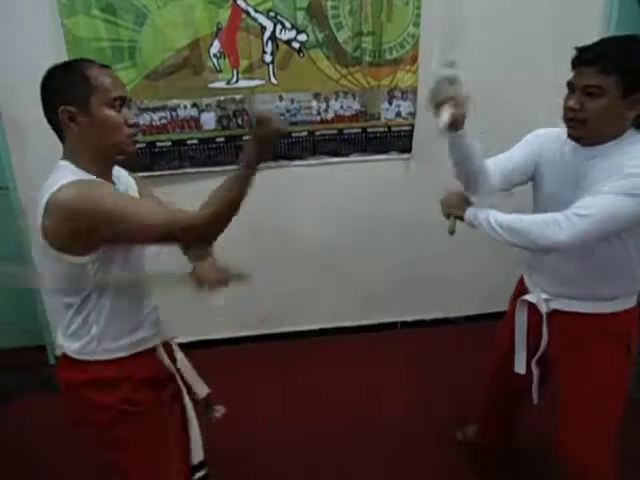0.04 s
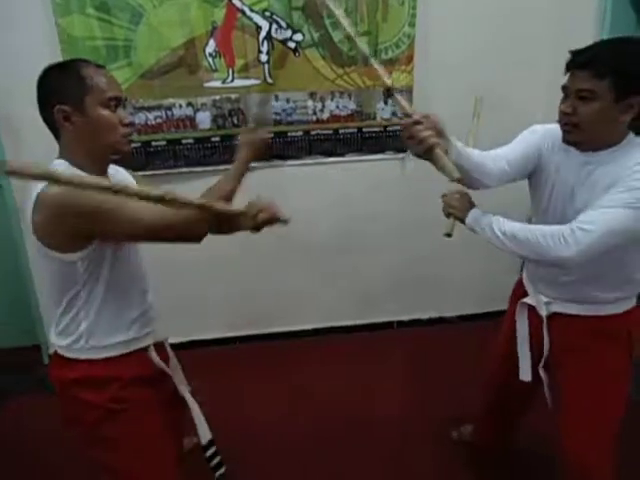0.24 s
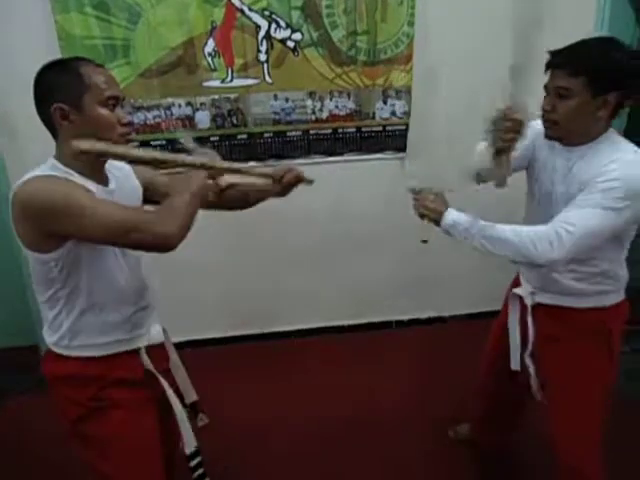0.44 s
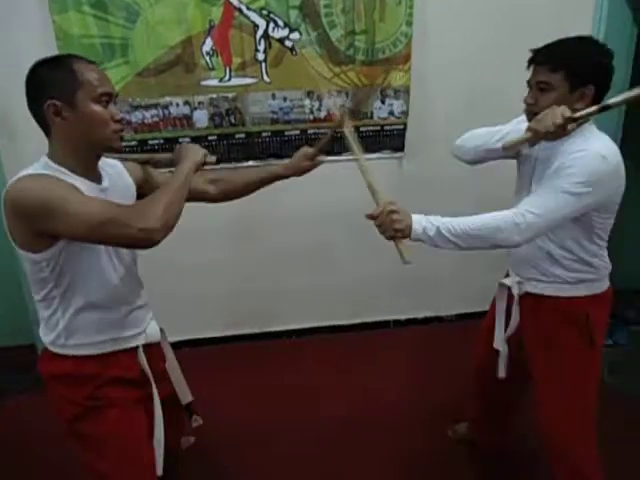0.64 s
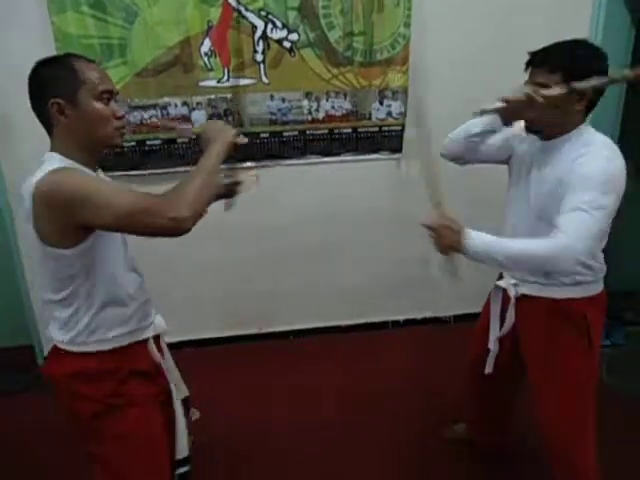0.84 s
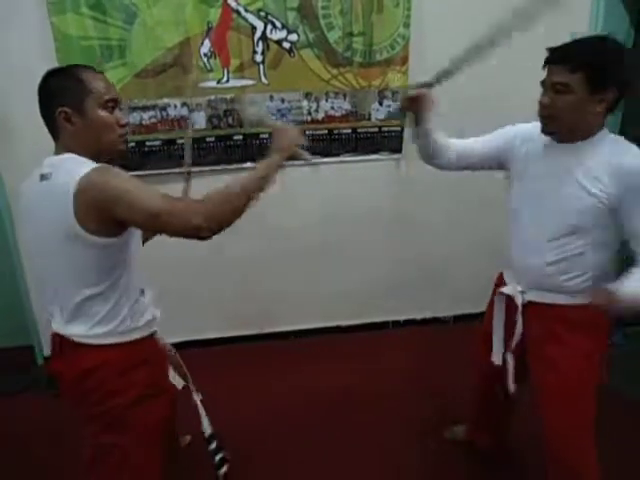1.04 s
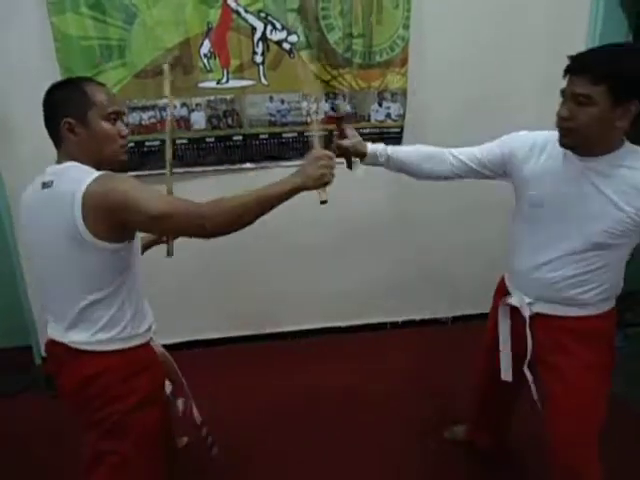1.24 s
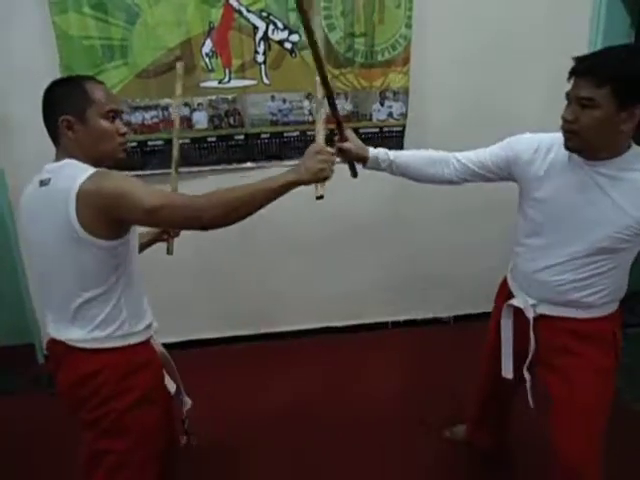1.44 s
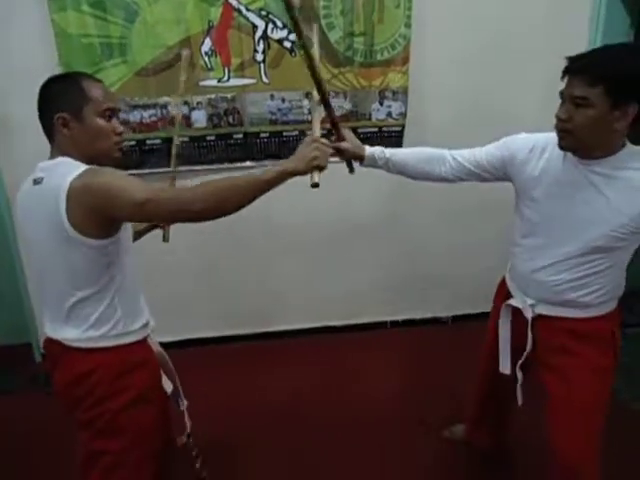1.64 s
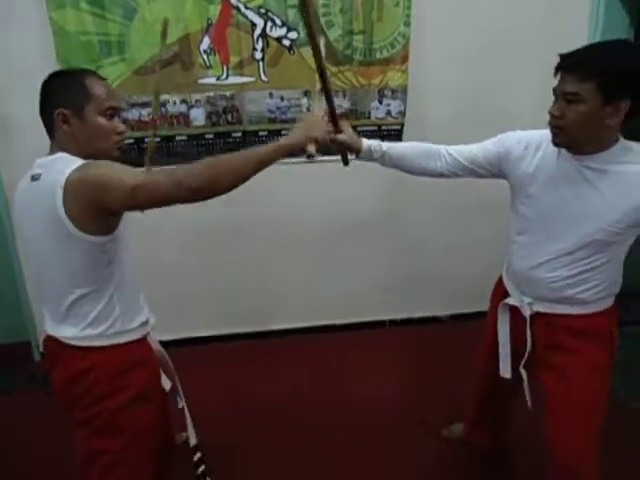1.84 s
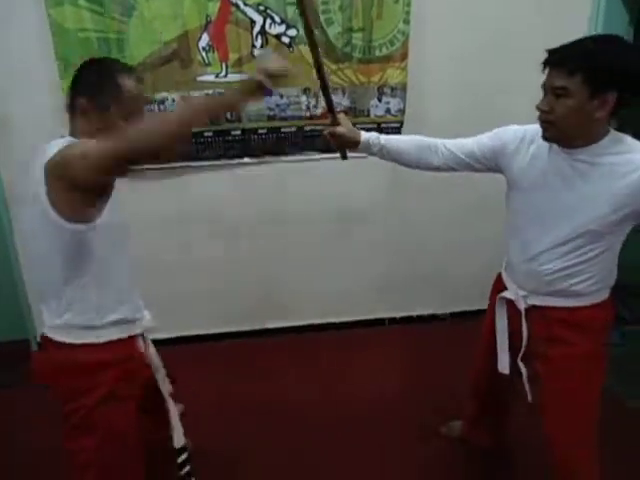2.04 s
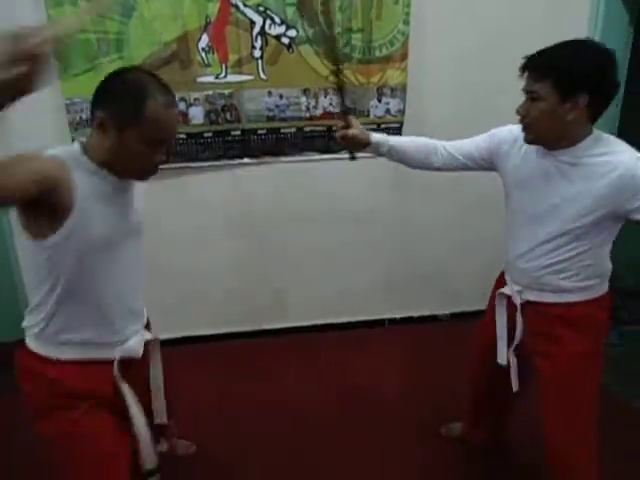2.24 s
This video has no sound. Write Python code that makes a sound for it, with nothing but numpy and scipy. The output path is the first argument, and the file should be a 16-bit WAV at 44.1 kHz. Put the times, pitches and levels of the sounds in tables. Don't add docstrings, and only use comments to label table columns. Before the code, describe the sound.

Wooden sticks clack sharply against each other in uneven blows inside a reverberant hard-walled gym

```python
import sys
import numpy as np
from scipy import signal
from scipy.fft import rfft, irfft
from scipy.io import wavfile
from scipy.ndimage import uniform_filter1d

SR = 44100
rng = np.random.default_rng(int(sys.argv[2]) if len(sys.argv) > 2 else 0)


def volts_from_decibels(level):
    exponent = np.asarray(level, float) / 20
    return 10 ** exponent


def persist_wave(psi):
    counts = np.round(np.clip(psi, -1, 1) * 32767).astype(np.int16)
    wavfile.write(sys.argv[1], SR, np.atleast_2d(counts).T)


N = 101429
LEAD = SR // 2
CIRCLE_HZ = abs(np.fft.fftfreq(16384, 1 / SR))

# start_s, direct_peak_db, walls_db, hall_db
BEFORE_BLOWS = [
    (-.3, -40, -60, -26.5),
    (.03, -44, -74, -48),
    (.1, -42, -81, -44.5),
]
FIRST_BLOWS = [
    (0.2015, 0.5, -19.5, -23.5),
    (0.2036, -3, -60, -63.5),
    (.2105, -11.5, -65, -59),
    (0.2155, -9.5, -60, -56.5),
    (0.3017, -15, -29.5, -54),
]
SECOND_BLOWS = [
    (.6722, -7.5, -25.5, -29),
    (.6743, -19, -54, -58.5),
]
ACROSS_BLOWS = [
    (1.0104, -19.5, -31, -26),
]
THIRD_BLOWS = [
    (1.1845, -6, -17.5, -20.5),
]
TAP_BLOWS = [
    (1.4655, -21.5, -37, -41),
    (1.5826, -25, -41.5, -43.5),
    (1.652, -30, -51, -47),
]
FAR_BLOWS = [
    (1.8285, -28.5, -33, -29.5),
    (1.834, -32, -27, -29),
]
RATTLE_BLOWS = [
    (1.9138, -13, -36, -33),
    (1.9183, -10, -32, -31),
]
LAST_BLOWS = [
    (1.9316, -9, -24, -25),
    (1.9415, -26, -29, -28.5),
]
# pitch_hz, width_hz, level_db
BEFORE_MODES = [(1360, 410, -8), (2400, 1200, -17), (3330, 130, -13.5), (5030, 140, -24.5)]
FIRST_MODES = [(603, 40, -4), (1130, 110, -5), (1650, 220, 0), (2610, 180, 0), (3050, 140, -5),
               (3380, 240, -3), (4450, 200, -14)]
SECOND_MODES = [(750, 150, -18), (1450, 160, 0), (1860, 220, -1), (2550, 200, -2), (2950, 300, 0),
                (3540, 250, -7), (4600, 200, -15)]
ACROSS_MODES = [(1220, 470, -2), (1700, 70, 5), (2310, 170, 1), (2540, 71, -1), (3320, 80, 7),
                (3600, 130, -17), (3770, 360, -2), (4630, 180, -5.5)]
THIRD_MODES = [(820, 310, -16), (1184, 61, 1.5), (1744, 93, 7.5), (2414, 43, -7), (2680, 440, 3.5),
               (3450, 600, -2.5), (4120, 300, -10), (5140, 260, -2.5)]
TAP_MODES = [(740, 230, -1.5), (1350, 110, 5.5), (2030, 80, -1.5), (2790, 200, -2), (3070, 98, 0.5),
             (4260, 160, -5.5)]
FAR_MODES = [(1100, 62, -7.5), (1560, 140, -23), (1700, 44, -6.5), (2365, 40, -4.5), (2914, 66, 1),
             (3815, 20, -2), (4730, 47, -34)]
RATTLE_MODES = [(635, 96, -16), (1480, 160, -14), (2380, 110, 0), (3050, 130, -2), (4790, 200, -18)]
LAST_MODES = [(600, 75, -12.5), (1100, 10, -1.5), (1836, 71, -8.5), (2530, 120, -5.5), (3044, 220, -3),
              (3640, 42, -1.5), (4080, 67, -3.5), (4455, 150, -6), (5230, 420, -16)]
# level_db, lowest_hz, spread_s
PAIR_CRACKS = [
    (-6, 550, .003),
    (-11, 860, 0.002145),
    (-10, 1080, 0.0018),
    (-9, 1000, .004),
    (-3.5, 820, .004),
    (-6.5, 1800, 0.00289),
    (-11.5, 820, 0.0041),
    (-19, 1700, 0.003083),
    (-15.5, 1530, 0.00391),
]


def stick_blows(mix):
    pairs = [
        (BEFORE_BLOWS, BEFORE_MODES), (FIRST_BLOWS, FIRST_MODES), (SECOND_BLOWS, SECOND_MODES),
        (ACROSS_BLOWS, ACROSS_MODES), (THIRD_BLOWS, THIRD_MODES), (TAP_BLOWS, TAP_MODES),
        (FAR_BLOWS, FAR_MODES), (RATTLE_BLOWS, RATTLE_MODES), (LAST_BLOWS, LAST_MODES)]
    for (blows, modes), crack in zip(pairs, PAIR_CRACKS):
        direct, diffuse = clack(modes, *crack)
        for start_s, direct_db, walls_db, hall_db in blows:
            add(mix, start_s, volts_from_decibels(direct_db) * direct)
            add(mix, start_s, signal.fftconvolve(gym(walls_db, hall_db), diffuse))


# pitch_hz, level_db (per Hz)
CRACK_SPECTRUM = [(150, -20), (600, 3), (1600, 4), (3000, 0.5), (4200, -4.5), (5300, -8.5), (7000, -21.5)]


def clack(modes, crack_db, lowest_hz, spread_s):
    grip_hz = 60
    blur_hz = 89.5
    band_hz = 352.7
    hz = np.fft.rfftfreq(16384, 1 / SR)
    late_s = spread_s * np.interp(hz / band_hz, np.arange(80), rng.random(size=80) ** 1.425)
    delay_turn = np.exp(-2j * np.pi * np.cumsum(late_s) * hz[1])
    high_pass = 1 / (1 + (lowest_hz / (CIRCLE_HZ + 1)) ** 6)
    crack_power = volts_from_decibels(crack_db + read(CRACK_SPECTRUM, CIRCLE_HZ)) ** 2 * high_pass
    sounds = []
    for damp_hz in grip_hz, grip_hz + blur_hz:
        power = crack_power.copy()
        for pitch_hz, width_hz, level_db in modes:
            damped_hz = width_hz + damp_hz
            peak = volts_from_decibels(level_db) ** 2 * (width_hz + grip_hz) / damped_hz
            power += peak / (1 + (2 * (CIRCLE_HZ - pitch_hz) / damped_hz) ** 2) ** 2
        click = rfft(causal(np.sqrt(power)), 16384)
        sounds.append(irfft(click * delay_turn)[:4096])
    direct, diffuse = sounds
    return direct / abs(direct).max(), diffuse / np.linalg.norm(diffuse)


# pitch_hz, t60_s
HALL_DECAY = [(300, 1), (700, 1), (1400, 0.72), (2800, 0.57), (5000, 0.54)]


def gym(walls_db, hall_db):
    walls_t60_s, walls_gap_s, hall_rise_s = 0.15, 0.003, 0.024
    t = np.arange(SR + SR // 2) / SR
    taps = rng.standard_normal(len(t)) * (rng.random(len(t)) < .06 + 4 * t)
    taps /= np.sqrt(np.minimum(0.042 + 4 * t, 1))
    hz, when_s, bands = signal.stft(taps, SR, nperseg=256)
    decay = volts_from_decibels(-60 * when_s / read(HALL_DECAY, hz)[:, None])
    hall = signal.istft(bands * decay, SR, nperseg=256)[1][:len(t)]
    walls = taps * volts_from_decibels(walls_db - 60 * t / walls_t60_s) * (t > walls_gap_s)
    return walls + volts_from_decibels(hall_db) * hall * (1 - np.exp(-t / hall_rise_s))


# level_db, pitch_hz, t60_s
LOOSE_STICK = (-26.5, 1088, 0.44)


def loose_stick(mix):
    level_db, pitch_hz, t60_s = LOOSE_STICK
    t = np.arange(8192) / SR
    decay = volts_from_decibels(level_db - 60 * t / t60_s)
    fade = np.minimum(t / .02, 1) * np.cos(np.pi * t / (2 * t[-1]))
    add(mix, LAST_BLOWS[0][0], decay * fade * np.sin(2 * np.pi * pitch_hz * t))


def forearm_thud(mix):
    level_db, pitch_hz, t60_s = -30.5, 205, 0.061
    t = np.arange(8192) / SR
    add(mix, FIRST_BLOWS[0][0], volts_from_decibels(level_db - 60 * t / t60_s) * np.sin(2 * np.pi * pitch_hz * t))


# start_s, level_db, pitch_hz, swell_s
FOOT_LANDING = (1.095, -41, 160, .025)


def footstep(mix):
    start_s, level_db, pitch_hz, swell_s = FOOT_LANDING
    t = np.arange(8192) / SR
    swell = np.e * t / swell_s * np.exp(-t / swell_s)
    add(mix, start_s, volts_from_decibels(level_db) * swell * np.sin(2 * np.pi * pitch_hz * t))


# pitch_hz, level_db, wander_hz
FAN_TONES = [(52, -7, 2.7), (113.6, 1, 2.15), (189, -11.5, 8), (240.4, -15.5, 2.7)]
# start_s, level_db
HUM_LEVEL = [(0.0, -53.5), (0.17, -50.5), (0.52, -52), (0.61, -67), (0.95, -52), (1.09, -71), (1.12, -57.5),
             (1.24, -51), (2.14, -50), (2.2, -61), (2.26, -51), (2.3, -47)]


def fan():
    t = np.arange(N) / SR
    hum = np.zeros(N)
    for pitch_hz, level_db, wander_hz in FAN_TONES:
        drift = sum(np.exp(2j * np.pi * (wander_hz * rate * t + phase))
                    for rate, phase in rng.uniform(-0.974, 1, (12, 2)))
        carrier = np.exp(2j * np.pi * pitch_hz * t)
        hum += volts_from_decibels(level_db) * evened(((7.5 + evened(drift)) * carrier).real)
    return hum * volts_from_decibels(np.interp(t, *np.transpose(HUM_LEVEL)))


# pitch_hz, level_db (per Hz)
ROOM_SPECTRUM = [(15, -26.5), (25, 2.5), (92, -1), (368, -1), (539, -6.5), (1410, -13), (2070, -34.5),
                 (2590, -24), (5300, -31.5), (6890, -73), (11700, -120)]


def room_wash():
    level_db, patch_db = -47, 1
    hz = np.fft.rfftfreq(2048, 1 / SR)
    real, imaginary, patches = rng.standard_normal((N // 512 + 5, 1025, 3)).T
    patches = uniform_filter1d(patches, 16, 0)
    patches = evened(uniform_filter1d(patches, 8, 1))
    gain = volts_from_decibels(read(ROOM_SPECTRUM, hz)[:, None] + patch_db * patches) * (hz > 15)[:, None]
    noise = signal.istft((real + 1j * imaginary) * gain, nperseg=2048, noverlap=1536)[1][:N]
    return volts_from_decibels(level_db) * evened(noise)


def evened(x):
    return x / np.sqrt(np.mean(abs(x) ** 2) + 1e-20)


def read(points, hz):
    f, value = np.transpose(points)
    return np.interp(np.log(hz + 1), np.log(f + 1), value)


def add(mix, start_s, sound):
    part = mix[LEAD + round(start_s * SR):][:len(sound)]
    part += sound[:len(part)]


def causal(gain, size=4096):
    log_spectrum = np.conj(signal.hilbert(np.log(gain + 1e-5)))
    return np.fft.ifft(np.exp(log_spectrum)).real[:size]


def scene():
    mix = np.zeros(N + LEAD)
    stick_blows(mix)
    loose_stick(mix)
    forearm_thud(mix)
    footstep(mix)
    return (mix[LEAD:] + fan() + room_wash())[None]


def low_pass(x):
    return signal.sosfilt(signal.butter(12, 15800, fs=SR, output="sos"), x)


# pitch_hz, level_db
BAND_EDGE = [(5150, -0.5), (5500, -14.5), (5950, -10), (6300, -43.5), (6700, -90)]


def record(dry):
    clip = .7
    band_filter = causal(volts_from_decibels(read(BAND_EDGE, CIRCLE_HZ)))
    narrow = signal.oaconvolve(dry, band_filter[None])[:, :N]
    return low_pass(np.clip(narrow, -clip, clip))


dry = scene()
out = record(dry)
persist_wave(out)
```